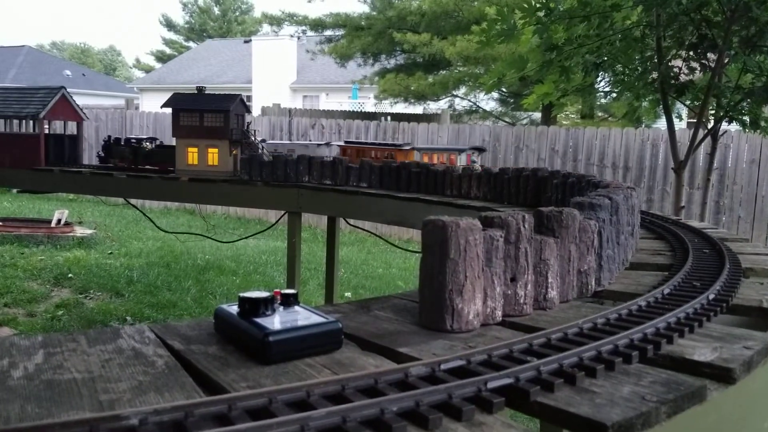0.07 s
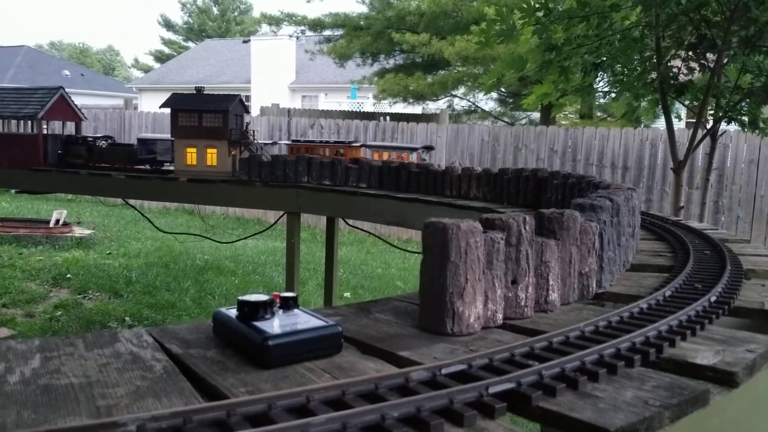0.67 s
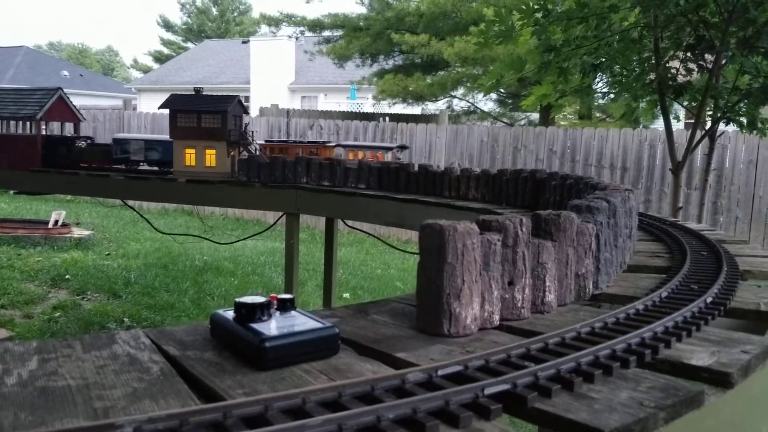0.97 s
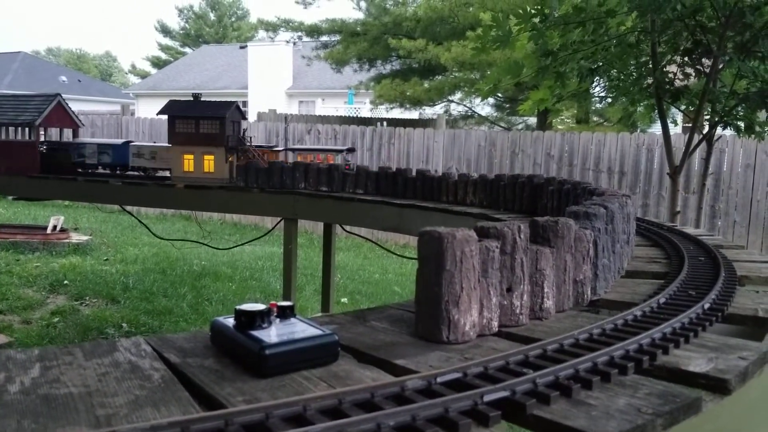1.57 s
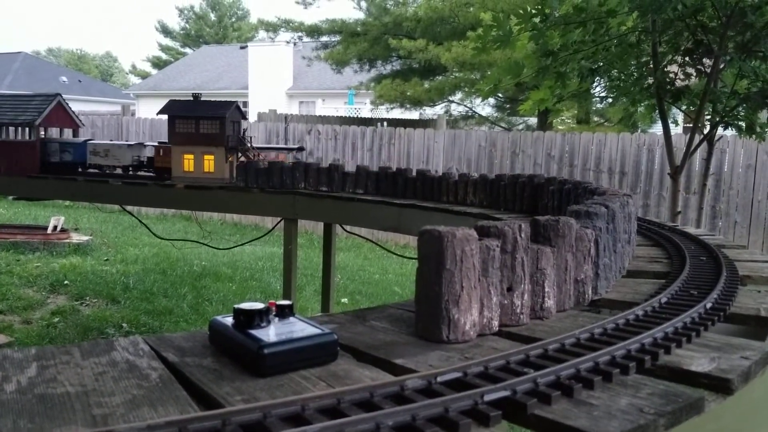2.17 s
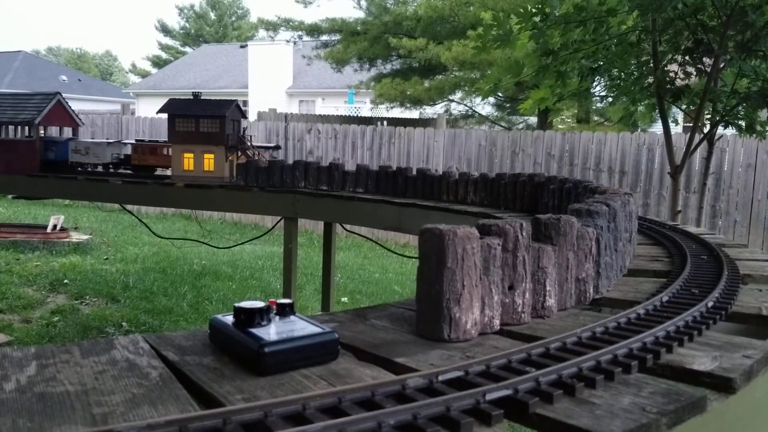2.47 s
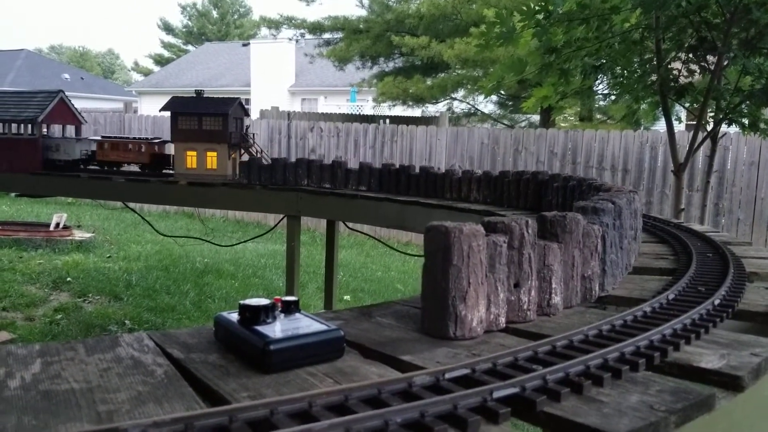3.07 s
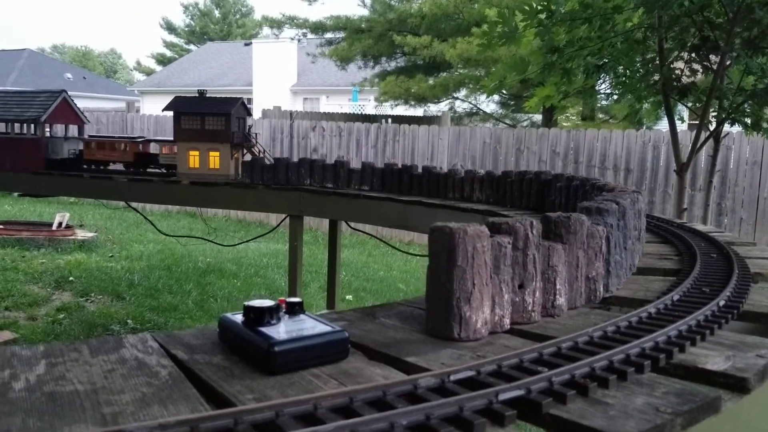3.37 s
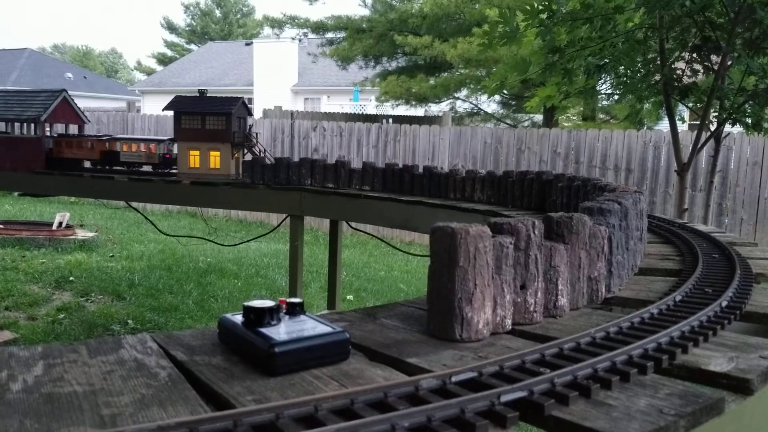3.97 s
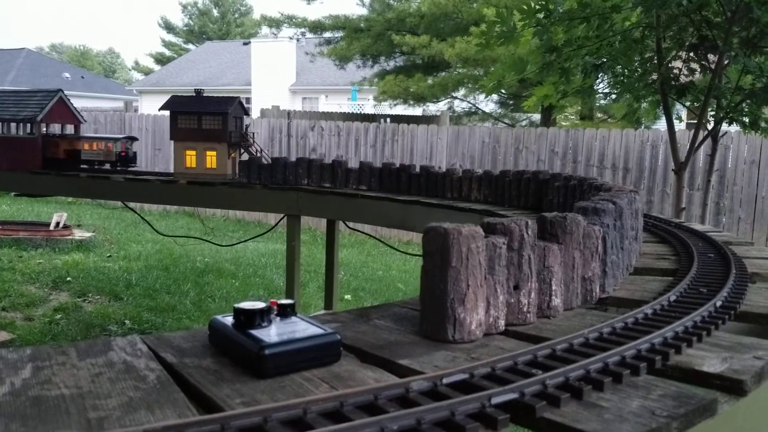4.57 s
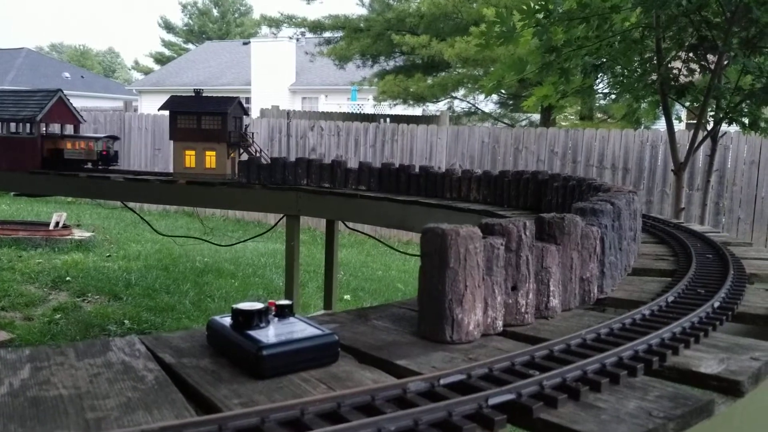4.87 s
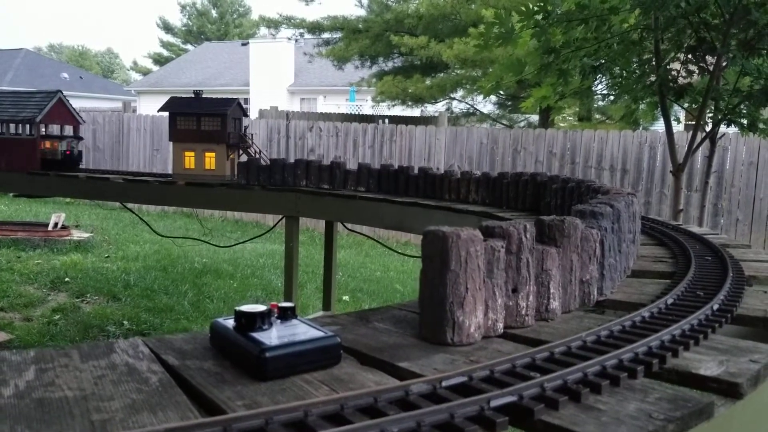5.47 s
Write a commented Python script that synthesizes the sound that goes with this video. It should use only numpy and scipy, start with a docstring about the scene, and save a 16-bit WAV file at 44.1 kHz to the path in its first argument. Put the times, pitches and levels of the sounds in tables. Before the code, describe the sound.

Cicadas buzz in pulsing, slurred phrases while a model train rumbles and clicks away along a garden railway.

```python
"""A model steam train rolls away along a raised garden railway: its wheels rumble on uneven rail and
click over the joints, and the wooden deck booms beneath. A near cicada, its tymbals ringing its hollow
body, sings five slurred phrases and runs down into a plain buzz; a second one pulses farther off.
Behind them lies a bed of insect chorus, air conditioner hum and suburban rumble."""
import sys
import numpy as np
from scipy import signal
from scipy.fft import rfft, irfft, next_fast_len
from scipy.io import wavfile
from scipy.ndimage import uniform_filter1d

SR = 44100
rng = np.random.default_rng(int(sys.argv[2]) if len(sys.argv) > 2 else 0)


def digitize_waveform(pressure):
    """Quantize a signal to 16-bit integers and store it at the path in sys.argv[1].

    Rows of a 2-D input are taken as channels; values are limited to [-1, 1].
    """
    field = np.atleast_2d(pressure).T
    bounded = np.clip(field, -1, 1)
    quanta = np.round(bounded * 32767).astype(np.int16)
    wavfile.write(sys.argv[1], SR, quanta)


N = 242988
T = np.arange(N) / SR

# tone of wheels rolling on track and deck: (frequency [Hz], relative level [dB])
ROLL_SPECTRUM = [(60, -21), (150, -1.5), (280, -1), (500, -3), (760, -1.5), (900, -6), (1120, -1.5),
                 (1450, -8), (1750, -12.5), (2300, -12.5), (3200, -33), (8500, -28), (12500, -21),
                 (16000, -24)]
# rougher stretches of track: (time [s], half length [s], boost [dB])
ROUGH_STRETCHES = [(.22, .16, 2), (2.35, 0.36, 2)]
# tone of the booming deck: (frequency [Hz], relative level [dB])
BOOM_SPECTRUM = [(25, -33), (60, 0.5), (78, -10), (97, 6.5), (130, -6.5), (170, 0.5), (240, -11),
                 (400, -20), (2000, -60)]
# swells of that boom: (time [s], half length [s], level [dB])
BOOM_SWELLS = [(.33, 0.072, -58), (2.72, .28, -51), (4.24, .11, -55.5), (5.42, 0.18, -58)]
# near cicada's phrases: (closing slur time [s], buzz level [dB], clean beat gain [dB], chirp level [dB])
PHRASES = [(.386, -41, -5, -42), (.925, -39, 2.5, -43), (1.446, -40.5, 1, -44), (1.976, -39.5, .5, -45),
           (2.5, -40.5, -0.5, -45)]
# partials of the locked tymbal beat, with a half order from alternating strong and weak strokes:
# (multiple of the beat, relative level [dB], left-right phase [rad])
TYMBAL_PARTIALS = [(8, -53, 1), (9, -54, 3), (10, -45.5, .5), (10.5, -45.5, 5.4), (11, -42, 3),
                   (12, -50, 1.5), (14, -55, 2), (16, -60, 3.5)]
# tone of the insect chorus: (frequency [Hz], relative level [dB])
CHORUS_SPECTRUM = [(2000, -31.5), (2800, -15), (3100, -11), (3530, -1), (3900, -2), (4180, -3.5),
                   (4550, -1), (4900, -0.5), (5200, -5.5), (5600, -2.5), (6400, -12.5), (7400, -14.5),
                   (8050, -20), (8700, -37), (16000, -57)]
# its stereo balance: (frequency [Hz], left over right [dB])
CHORUS_PAN = [(2800, 4), (3300, 0.5), (3600, 5.5), (4000, 2.5), (4500, -2.5), (5200, 1), (5500, -2.5),
              (6200, -3.5), (6700, -2.5), (8000, -1)]
# steady pitches that ring within the chorus: (frequency [Hz], relative level [dB])
CHORUS_RING_NOTES = [(3558, -67), (3817, -64), (4070, -62), (4274, -59), (4517, -61), (4910, -56),
                     (5136, -59)]
# compressor and fan tones: (frequency [Hz], relative left level [dB], relative right level [dB])
MOTOR_TONES = [(55.9, -64, -67), (111.7, -54, -57), (119.9, -61, -65), (239.9, -66, -68), (279.3, -71, -75),
               (354.1, -70, -74), (1119.9, -83, -72), (1296.7, -81, -75), (1355.8, -78, -70),
               (1414.6, -71, -84), (1473.5, -82, -78)]
# distant rumble and faint hiss: (frequency [Hz], relative level [dB])
SUBURB_SPECTRUM = [(15, -28), (35, -9), (58, -6), (75, 4), (100, 2.5), (170, 0), (280, -7), (700, -7.5),
                   (1300, -25), (1900, -21.5), (8700, -45), (10500, -43), (12800, -34), (14000, -20.5),
                   (16000, -28)]
# how centred the noise beds sit: (frequency [Hz], left-right coherence [0-1])
COHERENCE = [(100, 1), (250, 0.96), (500, 0.68), (1000, 0.25), (2500, 0.18), (8000, 0.14)]
# the loudest knocks at rail joints: (time [s], clink gain [dB], thud gain [dB])
JOINT_KNOCKS = [(0.2311, -54, -45), (0.6855, -49, -50), (1.132, -48, -50), (1.5893, -51, -53),
                (2.1716, -56, -43), (2.4544, -50, -47), (2.5217, -50, -49), (3.0744, -52, -58),
                (3.1174, -49.5, -44), (3.3338, -52.5, -53), (3.4915, -52, -51), (4.2944, -51, -55),
                (4.7953, -50, -48), (5.168, -50.5, -49)]
# ring of the wheels: (frequency [Hz], width [Hz], relative level [dB])
WHEEL_MODES = [(2400, 1630, 0.5), (3340, 480, 1.5), (11500, 2300, -12.5), (13200, 1900, -15)]
# ring of the deck: (frequency [Hz], width [Hz], relative level [dB])
DECK_MODES = [(222, 130, -3), (620, 510, -1), (1250, 590, -5.5)]

TYMBAL_HZ = 407.3  # the near cicada's stroke rate
CHORUS_EBB_DB_PER_S = 0.73


def gain_of(db):
    """Decibels to amplitude."""
    return 10 ** (np.asarray(db) / 20)


def unit_rms(x):
    """The signal scaled to an RMS of one."""
    return x / np.sqrt(np.mean(x ** 2) + 1e-20)


def curve(points, hz):
    """A breakpoint curve on a log-frequency axis."""
    knots_hz, values = np.transpose(points)
    return np.interp(np.log(hz + 1), np.log(knots_hz + 1), values)


def add(mix, start_s, sound):
    """Drop a stereo sound into the mix."""
    part = mix[:, max(round(start_s * SR), 0):][:, :sound.shape[1]]
    part += sound[:, :part.shape[1]]


def hump(centre_s, half_s):
    """A smooth rise and fall."""
    return np.exp(-((T - centre_s) / half_s) ** 2)


def drift(hz):
    """A random wobble of unit size, up to the given rate."""
    t = T[::100]
    rolloff = 1 + (np.fft.rfftfreq(4096, t[1]) / hz) ** 4
    slow = irfft(rfft(rng.standard_normal(4096)) / rolloff)
    return np.interp(T, t, unit_rms(slow[:len(t)]))


def resonate(x, hz, width_hz):
    """A steep resonance whose centre can glide; comes out at unit RMS."""
    carrier = np.exp(2j * np.pi * np.cumsum(hz * np.ones(x.shape[-1])) / SR)
    pole = np.exp(-np.pi * width_hz / SR)
    baseband = signal.lfilter([(1 - pole) ** 2], [1, -2 * pole, pole ** 2], x / carrier + 1e-18)
    return unit_rms((carrier * baseband).real)


def noise_bed(spectrum, pan, ripple_db, lead_ms):
    """Stereo noise; steady echoes ripple its spectrum, and it arrives on the left first."""
    size = next_fast_len(N, real=True)
    hz = np.fft.rfftfreq(size, 1 / SR)
    left, independent = rfft(rng.standard_normal((2, size)))
    coherence = np.clip(curve(COHERENCE, hz), -1, 1)
    right = coherence * left + np.sqrt(1 - coherence ** 2) * independent
    stereo = np.array([left, right * np.exp(-2j * np.pi * hz * lead_ms / 1000)])
    ripple = unit_rms(uniform_filter1d(rng.standard_normal(stereo.shape), size=80, axis=1))
    colour_db = curve(spectrum, hz) + ripple_db * ripple + np.outer([.5, -.5], curve(pan, hz))
    return unit_rms(irfft(stereo * gain_of(colour_db), size)[:, :N])


def yard(x, wet_db, t60):
    """The direct sound and its scatter from fence, houses and trees."""
    t = np.arange(SR // 2) / SR
    signs = rng.choice([-1., 1.], (2, len(t)))
    taps = signs * (rng.random(signs.shape) < .05) * gain_of(-60 * t / t60)
    taps *= gain_of(wet_db) / np.linalg.norm(taps, axis=1, keepdims=True)
    taps[0, 0] += 1
    taps[1, 2] += 1  # the direct sound lands two samples later on the right
    return signal.fftconvolve(x[None], taps, axes=1)[:, :N] / np.sqrt(1 + gain_of(2 * wet_db))


def receding_db(time_s, start_m=2.2, speed_m_per_s=0.4):
    """The train fades with distance as it pulls steadily away."""
    return -20 * np.log10(1 + speed_m_per_s * time_s / start_m)


def rolling_wheels(level_db=-50, flutter_db=1.4):
    """Small wheels rumble over uneven rail, left of centre."""
    rough_db = sum(db * hump(s, half_s) for s, half_s, db in ROUGH_STRETCHES)
    level = gain_of(level_db + receding_db(T) + rough_db + flutter_db * drift(24))
    pan = [(300, 1.5), (1000, -0.5), (2200, 5.5), (9000, -3.5)]
    return level * noise_bed(ROLL_SPECTRUM, pan, ripple_db=2.5, lead_ms=0.16)


def deck_boom(steady_db=-60):
    """The wooden deck carries the wheels' low end, swelling as the cars cross its looser boards."""
    level = gain_of(steady_db) + sum(gain_of(db) * hump(s, half_s) for s, half_s, db in BOOM_SWELLS)
    return level * noise_bed(BOOM_SPECTRUM, pan=[(100, 1.5), (400, 2.3)], ripple_db=3.5, lead_ms=0.2)


def slackness(slur_times, slacken_s=0.065, lag_s=0.023, tighten_s=.15):
    """A cicada slackens fast and tightens slowly: 0 when tight, about 1 at the bottom of a slur."""
    since = T - lag_s - slur_times[:, None]
    attack = np.clip(1 + since / slacken_s, 0, 1)
    release = np.exp(-np.maximum(since, 0) / tighten_s)
    return (attack * release).sum(0)


def cicada_buzz(db, ring_hz, beat_hz, width_hz, upper_db, octave_db, wet_db):
    """Ragged tymbal strokes ring the hollow body; the harder it sings, the brighter it gets."""
    effort = gain_of(db - db.max())
    beats = np.cumsum(beat_hz * (1 + .05 * drift(61.7))) / SR
    strokes = (0.36 + np.exp(-(beats % 1) / 0.18)) * rng.standard_normal(N)
    body = resonate(strokes, ring_hz, width_hz)
    upper = gain_of(upper_db) * resonate(strokes, 1.276 * ring_hz, width_hz=450)
    octave = gain_of(octave_db) * resonate(strokes, 2.02 * ring_hz, width_hz=2000)
    return yard(gain_of(db) * (body + effort * (upper + octave)), wet_db, t60=0.18)


def near_cicada(ring_hz=5040, slur_hz=520, dip_db=6,
                run_down_s=3.04, settle_s=0.23, settle_hz=415, settle_db=1.7, fade_db_per_s=2.5):
    """Each slur pulls pitch and level down together; at last the song sinks into a fading buzz."""
    slur_times, buzz_db = np.transpose(PHRASES)[:2]
    slack = slackness(slur_times)
    tail_s = np.maximum(T - run_down_s, 0)
    settled = 1 - np.exp(-tail_s / settle_s)
    db = np.interp(T, slur_times, buzz_db) - dip_db * slack - settle_db * settled - fade_db_per_s * tail_s
    pitch_hz = ring_hz - slur_hz * slack - settle_hz * settled
    return cicada_buzz(db, pitch_hz, TYMBAL_HZ, width_hz=560, upper_db=-8.5, octave_db=-23.5, wet_db=2)


def far_cicada(ring_hz=4500, slur_hz=1050, period_s=.499, level_db=-53, rise_db_per_s=0.6, swell_db=0.5):
    """A lower, wetter voice that slowly builds; its wide, even slurs carry better than its buzz."""
    slack = slackness(.005 + period_s * np.arange(T[-1] // period_s + 2))
    db = level_db + rise_db_per_s * T + swell_db * (slack - .5)
    pitch_hz = ring_hz - slur_hz * slack
    return cicada_buzz(db, pitch_hz, beat_hz=336.2, width_hz=770, upper_db=-9, octave_db=-41, wet_db=4.5)


def insect_chorus(start_db=-38, shimmer_db=0.42):
    """Many far insects merge into one shimmering band that slowly ebbs."""
    band = noise_bed(CHORUS_SPECTRUM, CHORUS_PAN, ripple_db=2.1, lead_ms=.14)
    return gain_of(start_db - CHORUS_EBB_DB_PER_S * T + shimmer_db * drift(9.3)) * band


def chorus_ringing(trim_db=-3, width_hz=11):
    """Thin, steady, wavering pitches ring within the insect chorus."""
    size = next_fast_len(N, real=True)
    bins_hz = np.fft.rfftfreq(size, 1 / SR)
    peaks = sum(gain_of(db) * unit_rms(1 / (1 + ((bins_hz - hz) / width_hz) ** 2))
                for hz, db in CHORUS_RING_NOTES)
    notes = irfft(rfft(rng.standard_normal((2, size))) * peaks, size)[:, :N]
    return gain_of(trim_db - CHORUS_EBB_DB_PER_S * (T - T.mean())) * notes


def air_conditioner(waver_db=1.8, trim_db=-1):
    """Compressor and fan tones waver on their way across the gardens."""
    out = np.zeros((2, N))
    for hz, left_db, right_db in MOTOR_TONES:
        level = gain_of(waver_db * drift(3) + trim_db)
        tone = np.sqrt(2) * np.sin(2 * np.pi * hz * T + .4 * drift(3))
        out += gain_of([[left_db], [right_db]]) * level * tone
    return out


def suburb_rumble(level_db=-52, wander_db=0.84):
    """Low rumble of the neighbourhood under a faint, even hiss."""
    level = gain_of(level_db + wander_db * drift(4))
    pan = [(100, 1.9), (2000, 5.2), (9000, 4)]
    return level * noise_bed(SUBURB_SPECTRUM, pan, ripple_db=0.5, lead_ms=0.063)


def light_knocks(per_s=2.5, clink_db=-52.5, thud_db=-53):
    """Randomly timed knocks that fade with distance, as rows like those of JOINT_KNOCKS."""
    times = T[rng.random(N) < per_s / SR]
    distance_db = receding_db(times)
    return list(zip(times, clink_db + distance_db, thud_db + distance_db))


def rail_joints(clink_t60=0.21, thud_t60=0.088, attack_s=0.00076, clink_trim_db=-.5):
    """A wheel drops into a rail gap: wheel and couplings chatter, and the deck thuds."""
    out, t = np.zeros((2, N)), np.arange(SR // 4) / SR
    attack = 1 - np.exp(-t / attack_s)
    for start_s, clink_db, thud_db in list(JOINT_KNOCKS) + light_knocks():
        chatter = rng.standard_normal((2, len(t)))
        narrowed = chatter + .5 * chatter[::-1]  # crossfeed pulls the thud toward the centre
        clink = sum(gain_of(db) * resonate(chatter, hz, width) for hz, width, db in WHEEL_MODES)
        thud = sum(gain_of(db) * resonate(narrowed, hz, width) for hz, width, db in DECK_MODES)
        clink *= gain_of(clink_db + clink_trim_db - 60 * t / clink_t60)
        thud *= gain_of(thud_db - 60 * t / thud_t60)
        add(out, start_s, attack * (clink + thud))
    return out * gain_of([[1], [-1]])  # left of centre


def cicada_slurs(swell_s=.046, stagger_s=.026, upper_db=-11, sag_per_s=.075):
    """A near phrase ends in a falling chirp; then the strokes lock into a clean beat, highs first."""
    out, t = np.zeros((2, N)), np.arange(-SR // 6, SR // 4) / SR
    chirp_hz = np.interp(t, [-.13, -.065, -.025], [5200, 5000, 4480])
    chirp_swell = np.interp(t, [-.13, -.075, -.03, -.005], [0, 1, 1, 0])
    for slur_s, _, beat_db, chirp_db in PHRASES:
        rasp = rng.standard_normal((2, len(t)))
        chirp = resonate(rasp, chirp_hz, width_hz=150)
        chirp += gain_of(upper_db) * resonate(rasp, 1.294 * chirp_hz, width_hz=300)
        add(out, slur_s + t[0], gain_of(chirp_db) * chirp_swell * chirp)
        beats = np.cumsum(TYMBAL_HZ * (1 - sag_per_s * t + .0015 * drift(40)[:len(t)])) / SR
        for multiple, partial_db, stereo_rad in TYMBAL_PARTIALS:
            peak_s = stagger_s * np.clip((10.5 - multiple) / 1.5, -.6, .6)
            since = (t - peak_s) / swell_s
            swell = 1 / np.cosh(since * np.where(since < 0, 1.3, .9))  # quick rise, lingering echo
            scatter = signal.resample(rng.standard_normal((2, 16)), len(t), axis=1)
            phase = 2 * np.pi * (multiple * beats + rng.random()) + [[stereo_rad], [0]] + .3 * scatter
            level = gain_of(partial_db + beat_db + scatter[::-1]) * swell
            add(out, slur_s + t[0], np.sqrt(2) * level * np.sin(phase))
    return out


def scene():
    """Insects and train over the hum and rumble of the suburb."""
    insects = near_cicada() + cicada_slurs() + far_cicada() + insect_chorus() + chorus_ringing()
    train = rolling_wheels() + deck_boom() + rail_joints()
    return insects + train + air_conditioner() + suburb_rumble()


def record(dry):
    """A steep low-pass takes off the very top."""
    lowpass = signal.firwin(601, cutoff=15930, window=("kaiser", 9), fs=SR)
    return signal.oaconvolve(dry, lowpass[None], "same")


dry = scene()
out = record(dry)
digitize_waveform(out)
```